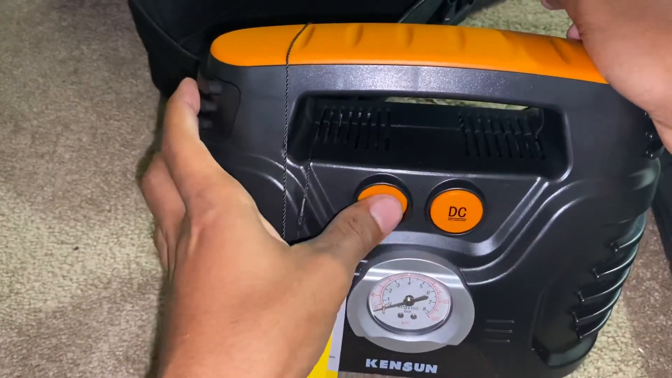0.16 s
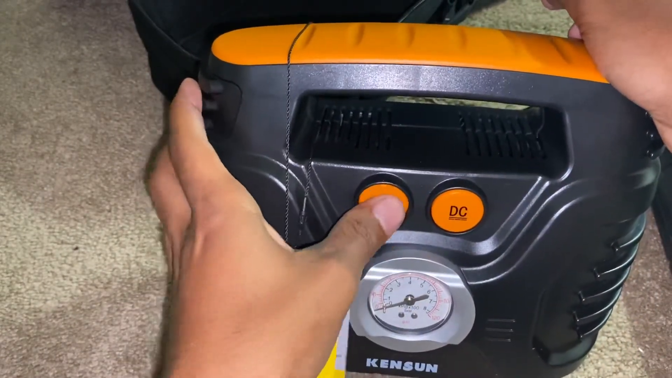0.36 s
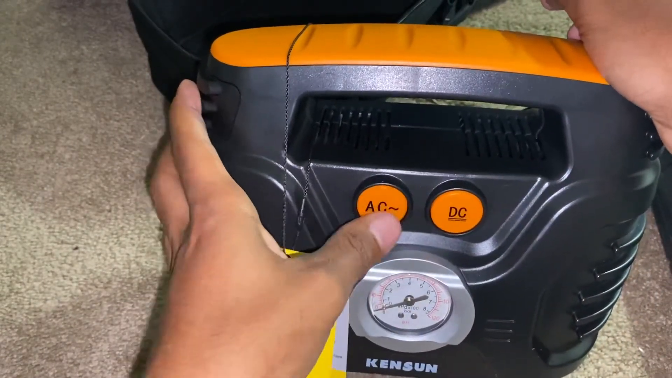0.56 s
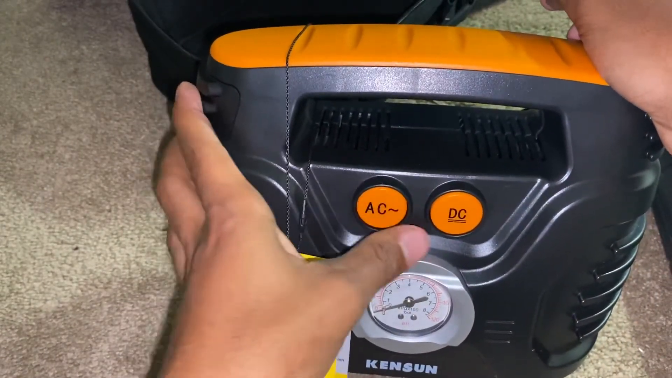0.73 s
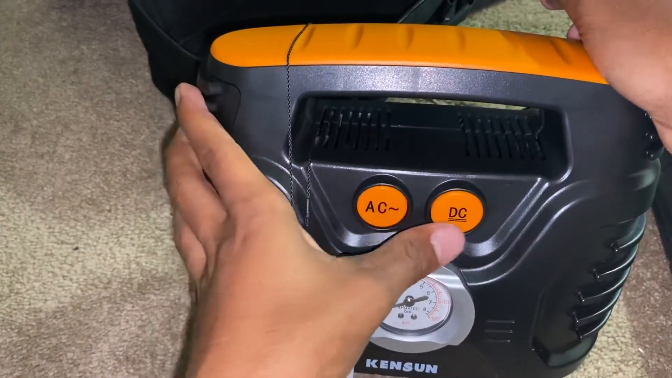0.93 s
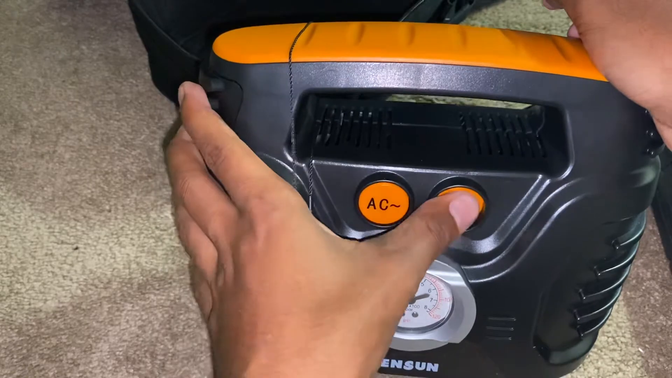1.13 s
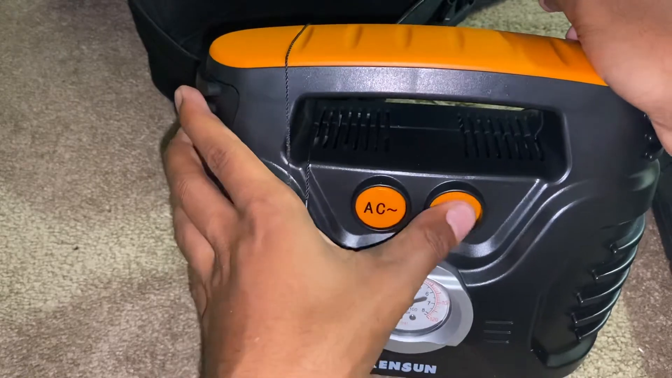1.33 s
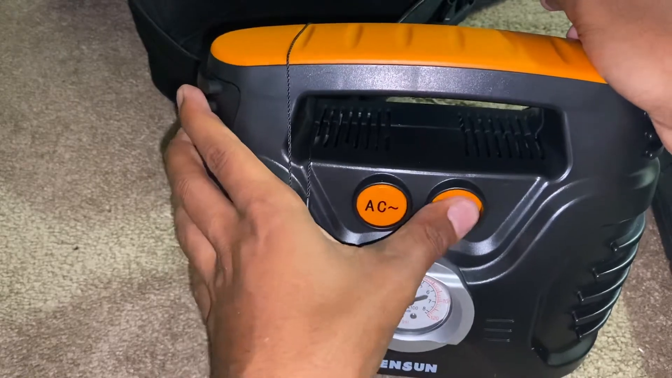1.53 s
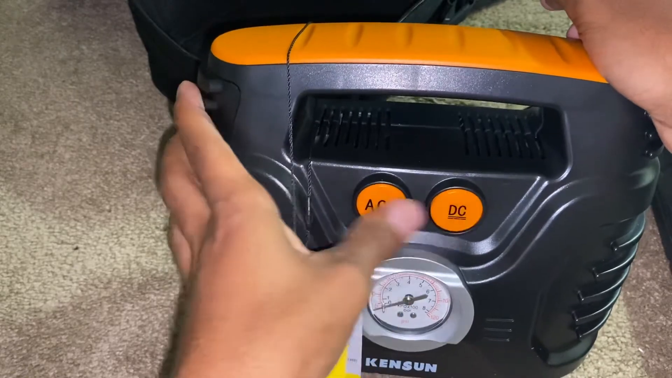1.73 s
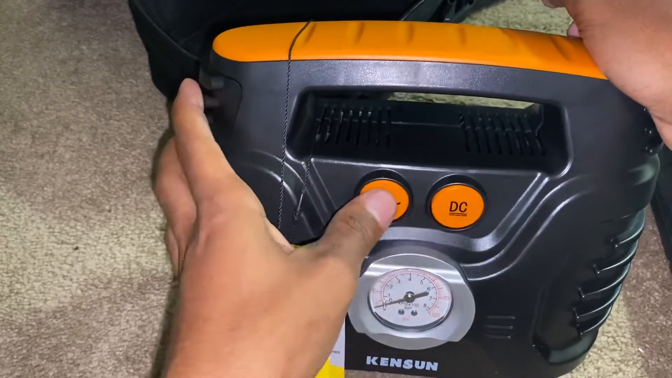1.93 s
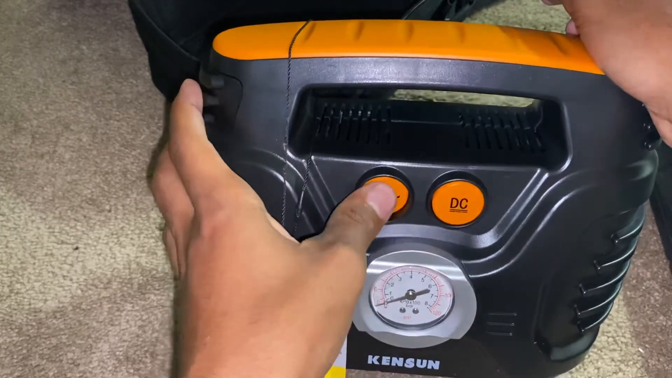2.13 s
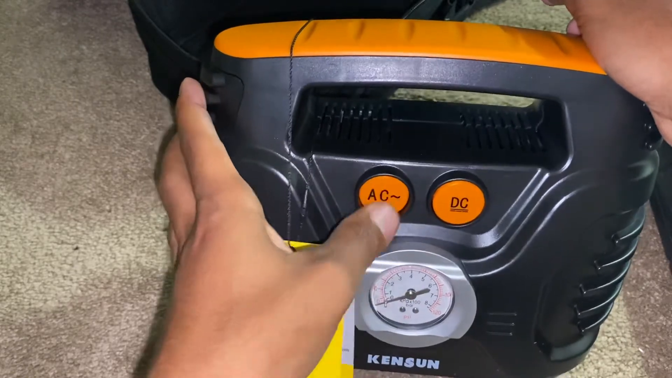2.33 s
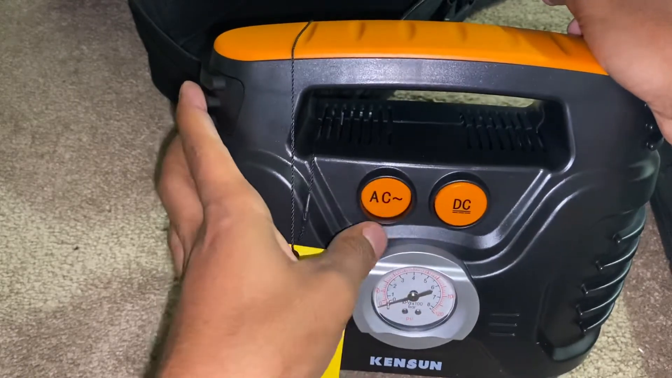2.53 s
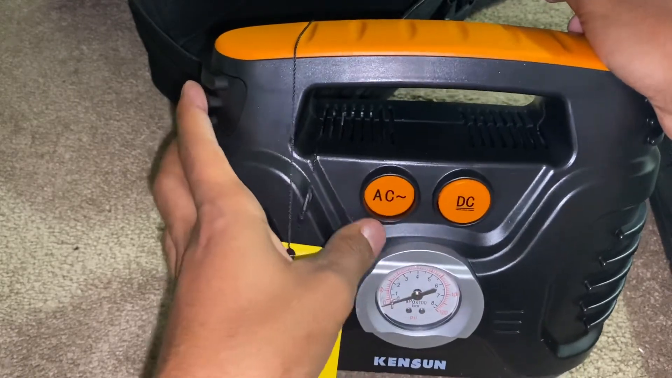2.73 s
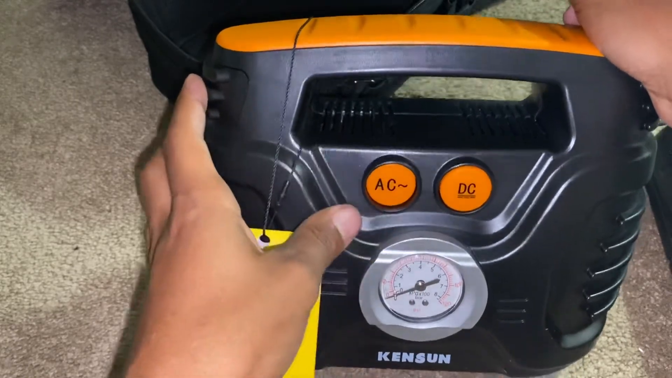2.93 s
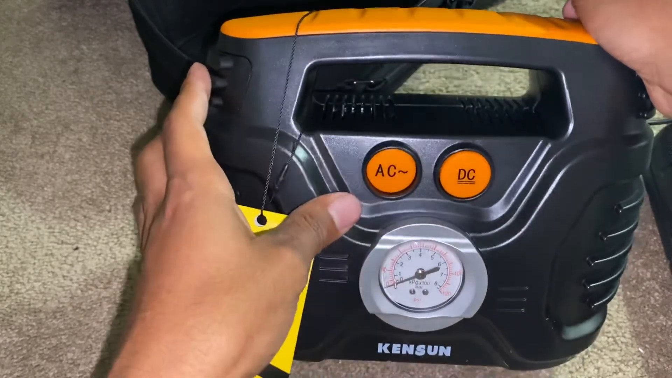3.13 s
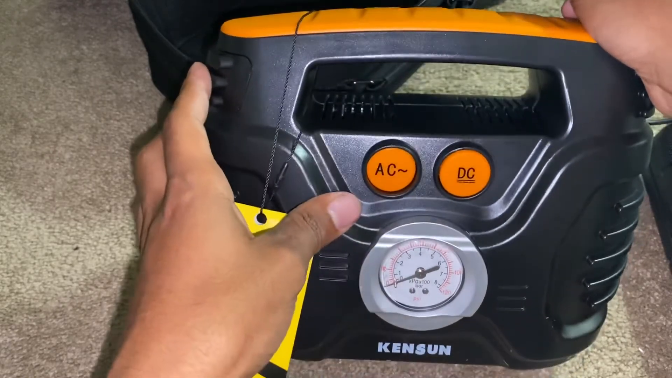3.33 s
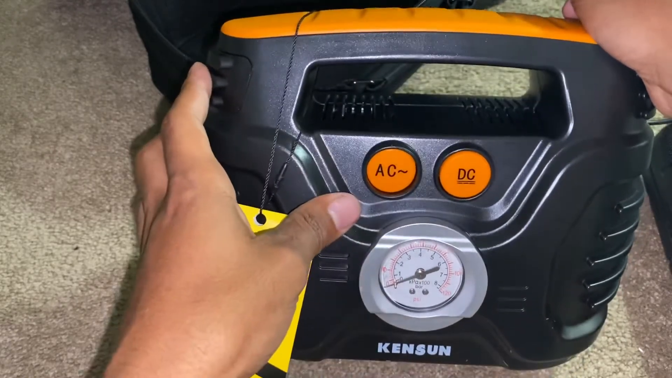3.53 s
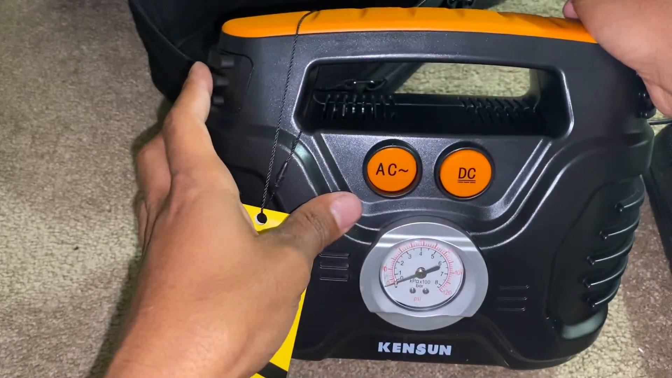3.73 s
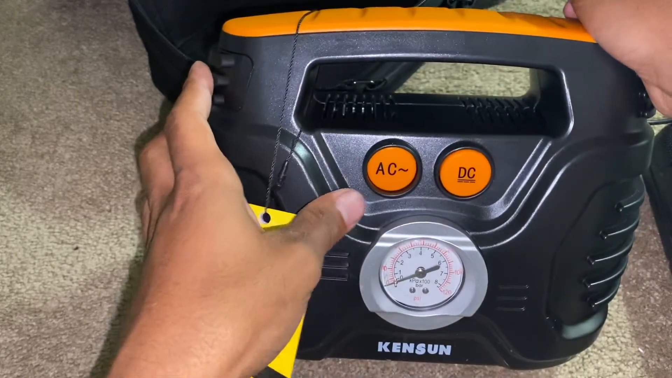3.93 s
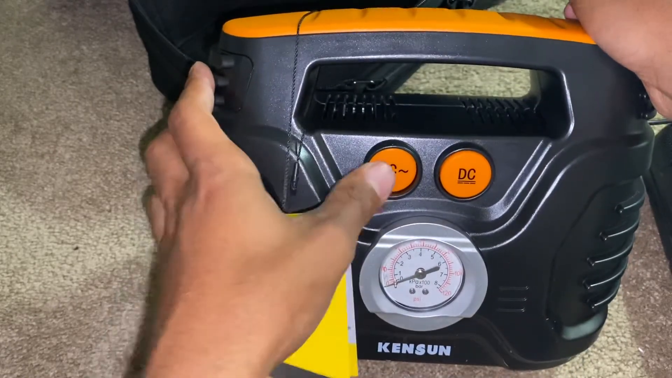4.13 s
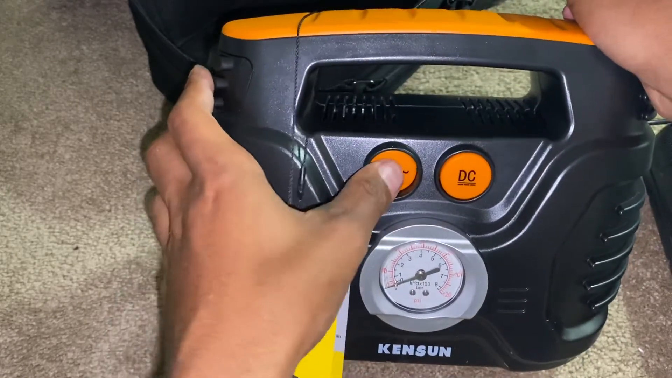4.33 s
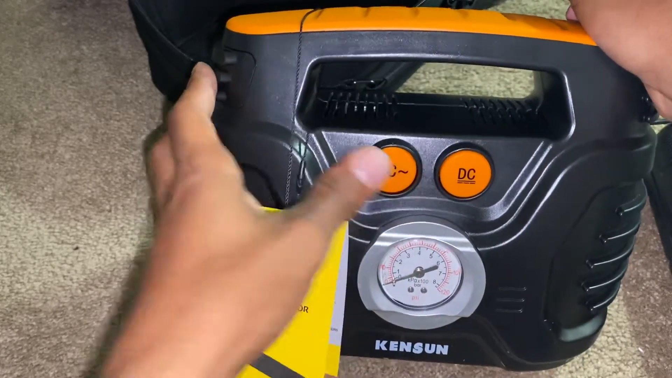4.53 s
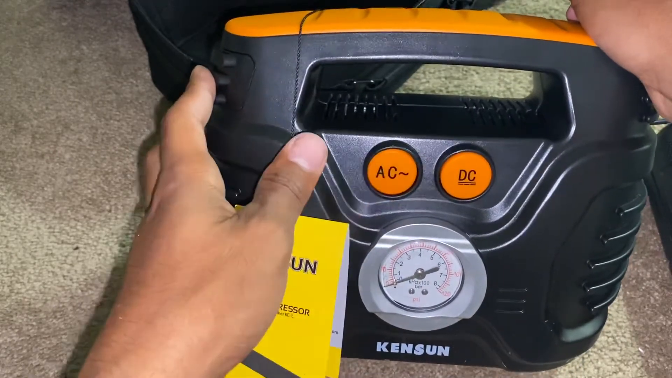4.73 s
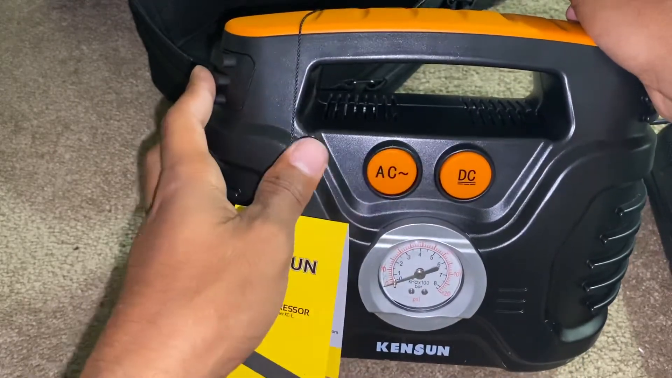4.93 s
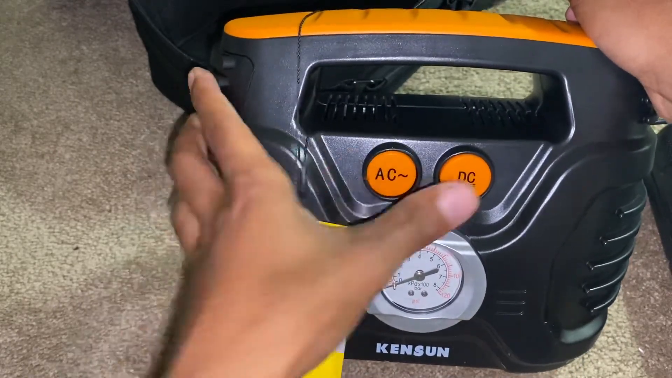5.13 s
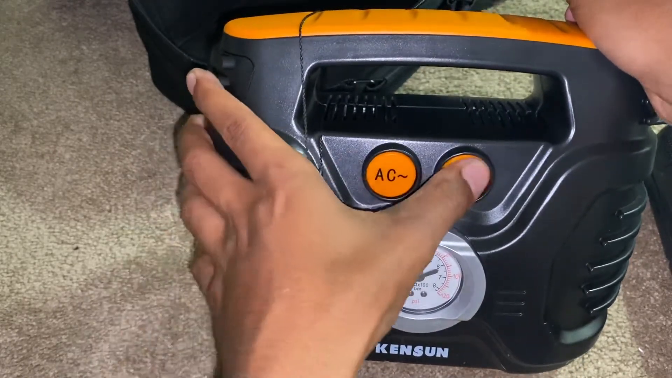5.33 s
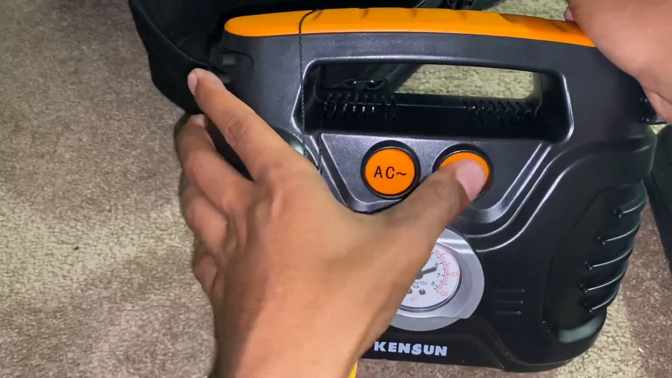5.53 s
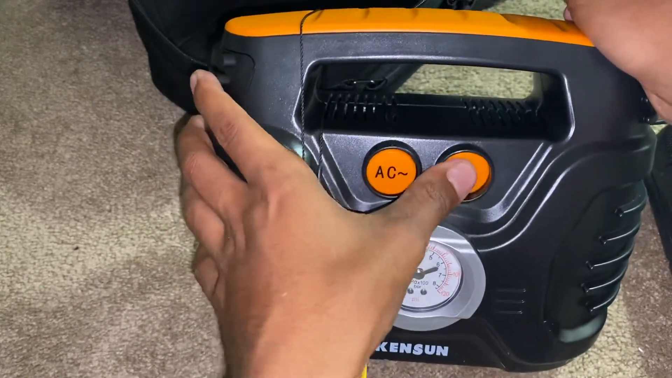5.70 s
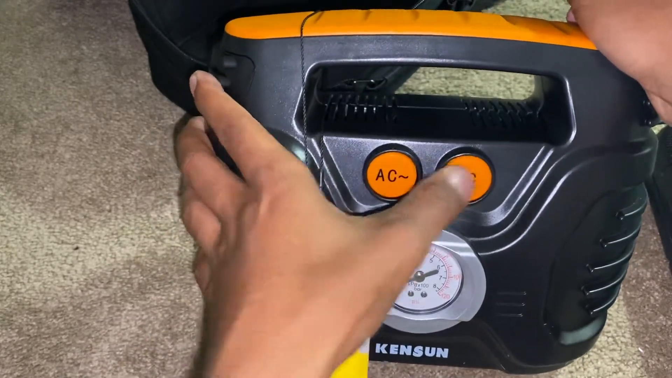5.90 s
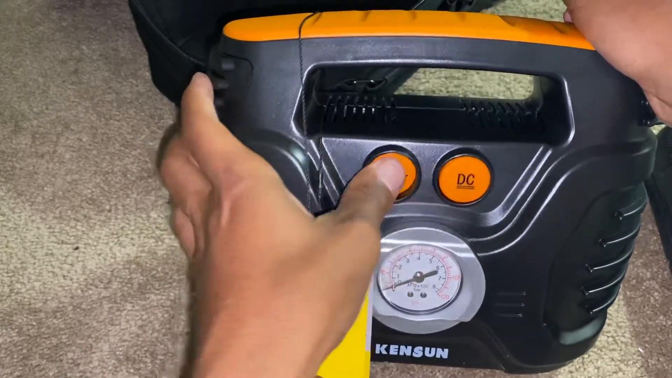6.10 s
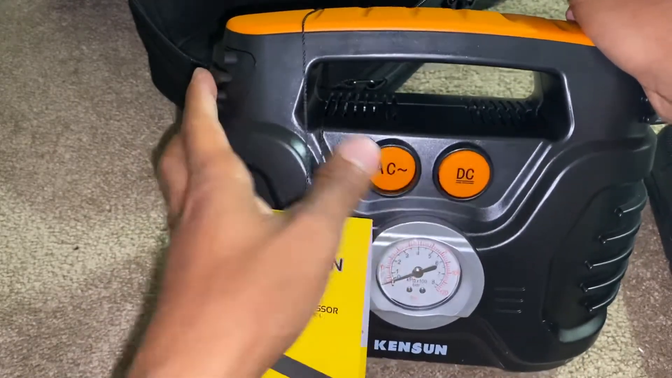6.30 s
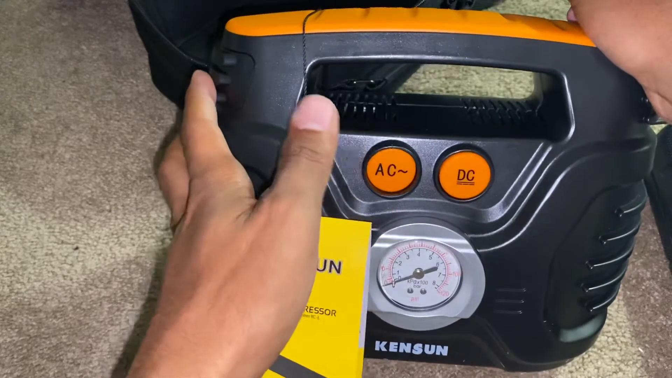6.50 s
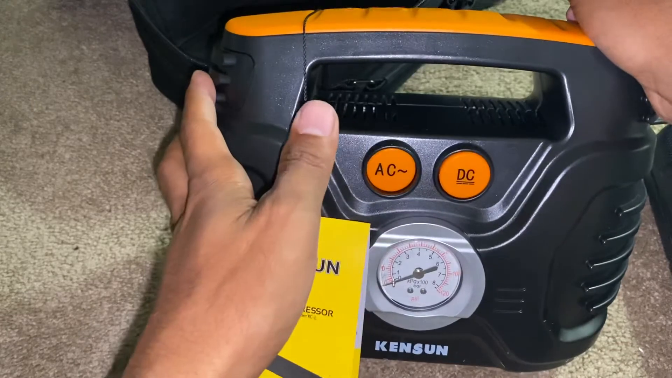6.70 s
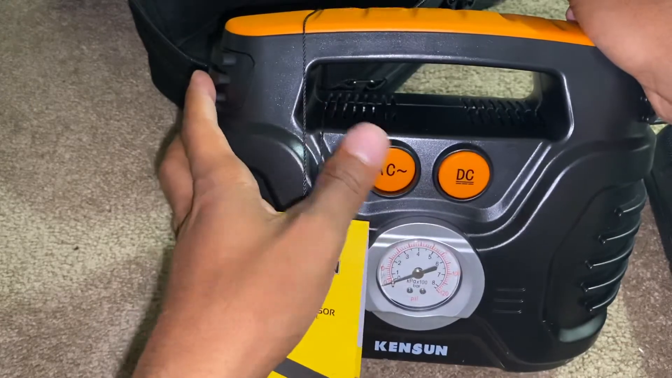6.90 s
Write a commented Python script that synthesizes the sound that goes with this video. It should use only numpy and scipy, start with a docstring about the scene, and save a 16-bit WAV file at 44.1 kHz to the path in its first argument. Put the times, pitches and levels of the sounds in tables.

```python
"""A small piston air pump in a plastic case on a carpet is heard close to a phone, already running.
Each crank turn gives an airy puff and three knocks, built from pulses that ring the case and from shaped noise.
It coasts down with squeaks; a thumb rustles and clicks push buttons (noise bursts and ringing plastic).
The pump starts again, coasts to a stop, more clicks follow, and a third run lasts to the end.
A steady hum and a dull rumble of noise lie under it all."""
import sys
import numpy as np
from scipy import signal
from scipy.fft import rfft, irfft, next_fast_len
from scipy.io import wavfile
from scipy.ndimage import map_coordinates

SR = 44100
rng = np.random.default_rng(int(sys.argv[2]) if len(sys.argv) > 2 else 0)


def store_wav(level_fs):
    """Save 16-bit WAV to argv[1]."""
    pcm = np.round(np.clip(np.atleast_2d(level_fs), -1, 1) * 32767)
    wavfile.write(sys.argv[1], SR, pcm.T.astype(np.int16))


N = 306936
T = np.arange(N) / SR  # time in s

# colour of rushing air and motor whirr through the case: pitch_hz, relative level_db (per Hz)
AIR_COLOUR = [(40, -19), (60, -8), (150, -10), (420, 1.5), (1150, -1), (1550, -2.5), (1850, -0.5),
              (2250, -4), (2700, -5), (3030, -5), (3350, -5), (4200, -6), (4900, -8), (6500, -9.5),
              (8500, -4.5), (11000, -4), (13000, -4.5), (14000, -11.5), (15700, -12), (16100, -53)]
# bright snaps of the switches: start_s, level_db
SWITCH_SNAPS = [(1.1029, -45.5), (1.1324, -29), (1.3259, -28), (1.5005, -27), (1.6474, -26.5),
                (1.7928, -44), (2.1206, -33), (5.3914, -26.5), (5.5293, -25.5), (5.6924, -46.5),
                (5.7144, -25), (5.8474, -24), (6.0921, -46.5), (6.1074, -29.5)]
SNAP_T60_S = 0.017  # a snap or skin tick falls by 60 dB in this time


def amp(db):
    """Turn decibels into a plain multiplier."""
    return 10 ** (np.asarray(db) / 20)


def unit(x):
    """Scale a sound to an rms (average strength) of 1."""
    return x / np.sqrt(np.mean(x ** 2) + 1e-20)


def along(points, hz):
    """Read a value between (Hz, value) points on a log frequency axis."""
    f, v = np.transpose(points)
    return np.interp(np.log(hz + 1), np.log(f + 1), v)


def wobble(rate):
    """A smooth random curve through this many random points a second."""
    points = rng.standard_normal(int(N * rate / SR) + 4)
    return map_coordinates(points, [T * rate])


def filtered(x, response):
    """Change the strength and phase of each frequency by a response."""
    m = next_fast_len(N + SR // 2)
    hz = np.fft.rfftfreq(m, 1 / SR)
    return irfft(rfft(x, m) * response(hz), m)[..., :N]


def noise(spectrum):
    """Coloured noise of rms 1."""
    return unit(filtered(rng.standard_normal(N), lambda hz: amp(along(spectrum, hz))))


def spread(mid, side, alike):
    """Make left and right from a shared part and an opposed part, mixed by likeness at each frequency."""
    def shares(hz):
        angle = np.arccos(np.clip(along(alike, hz), -1, 1)) / 2
        return np.array([np.cos(angle), np.sin(angle)])
    mid, side = filtered(np.array([mid, side]), shares)
    return np.array([mid + side, mid - side])


def crank():
    """Speed in Hz and turns counted from a puff: a quick spin-up, then coasting against drag."""
    # runs of the motor: on_s, off_s, time of one puff_s, full crank speed_hz
    runs = [(-1, .406, .048, 53.2), (2.108, 4.498, 4.337, 53.28), (6.103, 9, 6.352, 53.12)]
    spin_up_s, coast_s = .034, .365  # time constants
    drag_hz = 24  # coasting heads this far below zero, so the crank really stops
    speed, turns = np.zeros(N), np.zeros(N)
    for on, off, puff, hz in runs:
        rise = 1 - np.exp(-np.maximum(T - on, 0) / spin_up_s)
        coasting = (hz + drag_hz) * np.exp(-np.maximum(T - off, 0) / coast_s) - drag_hz
        run = rise * np.maximum(coasting, 0)
        count = np.cumsum(run) / SR
        speed = speed + run
        turns = np.where(T >= on, count - count[round(puff * SR)], turns)
    return speed, turns + .008 * wobble(5)


def gain(speed, column):
    """Gain of one layer at this crank speed: a faster crank is mostly louder."""
    # loudness against speed: crank speed_hz, knocks_db, puff_db, whirr_db (all relative)
    effort = np.array([(0.99, -43.5, -58, -56), (8.2, -15, -42.5, -32.5), (18.5, -12, -4.5, -10),
                       (30, -5.5, -2.5, -12.5), (43, -2, 0.5, -1), (57.4, 0, 0.5, 2)])
    return amp(np.interp(speed, effort[:, 0], effort[:, column])) * (speed > 0)


def knocks(speed, turns):
    """Piston, rod and valve plate strike once a turn, each into its own modes of the case."""
    # knocks of one turn: share of the turn after the puff, modes as (pitch_hz, width_hz, relative level_db)
    knock_modes = [(0.2021, [(247, 130, -8), (377, 69, 0.5), (431.2, 44.4, 1), (701.6, 33, -2),
                   (810, 58, -5.5)]), (-.06, [(625, 54, -8.5), (824, 27, -17), (1113, 27, -6),
                   (1320, 32, -14)]), (0.19, [(1376, 45, -9.5), (1806, 110, -12.5), (1837, 62, -3),
                   (2013, 65, -11.5), (2400, 200, -28.5), (3016, 130, -16), (4190, 190, -24)])]
    least_loss = .055  # narrowest mode: width over frequency; plastic damps its high modes fast
    out = np.zeros(N)
    for share, modes in knock_modes:
        struck = (np.diff(np.floor(turns - share)) > 0) & (speed[1:] > 1)
        at = np.flatnonzero(struck)
        luck = rng.standard_normal((len(at), 2))
        # each blow varies a little in time (samples) and in strength (dB)
        places = np.clip(at + np.round(1.9 * luck[:, 0]).astype(int), 0, N - 1)
        blows = np.bincount(places, amp(0.57 * luck[:, 1]), N)

        def case(f):
            total = 0
            for k, (c, width, db) in enumerate(modes):
                loss = 1j * f * max(width, least_loss * c)
                total = total + (-1) ** k * amp(db) * loss / (c * c - f * f + loss)
            return total

        out += filtered(blows * gain(speed, column=1), case)
    return amp(25) * out


def pump(speed, turns):
    """The steady part (knocks, shake) and the airy part (puff of each stroke, even whirr, wavering gear tone)."""
    # unbalance of the crank: multiple of crank speed, rms level_db at top speed
    unbalance = [(1, -44.5), (2, -35), (4, -34.5)]
    gear_ratio = 33.72  # gear tone as a multiple of crank speed
    pace = speed / speed.max()
    tones = sum(np.sqrt(2) * amp(db) * np.sin(2 * np.pi * k * turns) for k, db in unbalance)
    shake = tones * pace ** 2.8
    # slow strokes are narrower within their turn, so they stand further apart
    sharp = 1.9 + 1.0 * (1 - pace)
    stroke = np.exp(sharp * (np.cos(2 * np.pi * turns) - 1)) * amp(1.7 * wobble(45))
    puff = amp(-21.5) * stroke * gain(speed, column=2) * noise(AIR_COLOUR)
    whirr = amp(-29.5 + 0.56 * wobble(4.9)) * noise(AIR_COLOUR)
    mesh = amp(1.5 * wobble(40)) * np.sin(2 * np.pi * (gear_ratio * turns + .15 * wobble(25)))
    gear = amp(-37) * mesh * (.5 + stroke)  # the teeth are loaded hardest in the stroke
    return knocks(speed, turns) + shake, puff + gain(speed, column=3) * (whirr + gear)


def valve(speed, turns):
    """Slow air past the valve reed whistles unsteadily with its octave, longer as the crank slows."""
    # squeak level while coasting, silent outside this range: crank speed_hz, level_db
    squeak_levels = [(14, -29), (25, -26.5), (45, -26)]
    # groans of the nearly stalled strokes, last or first of a run: start_s, length_s, pitch_hz, level_db
    groans = [(0.724, .025, 460, -32), (.739, 0.03, 986, -33), (2.121, 0.019, 907, -28),
              (4.78, 0.016, 690, -30.5), (4.785, 0.019, 480, -28.5), (4.799, .025, 920, -32.5),
              (4.84, 0.054, 424, -48), (6.128, .012, 760, -26.5)]
    lead, share = .13, .46  # a squeak starts this part of a turn before the puff and lasts this part of a turn
    squeak_hz, squeak_rise, squeak_octave_db = 770, 10000, -11  # starting pitch, rise in Hz per s
    groan_rise, groan_octave_db = 1500, -15  # rise in Hz per s
    out = np.zeros(N)
    leak = amp(-13) * noise(AIR_COLOUR)  # air hissing through the reed, below the whistle
    drift, flutter = .75 * wobble(170), amp(2.5 * wobble(90))  # phase in radians, gain
    coasting = np.diff(speed) < 0
    in_range = (speed[1:] > squeak_levels[0][0]) & (speed[1:] < squeak_levels[-1][0])
    at = np.flatnonzero((np.diff(np.floor(turns + lead)) > 0) & coasting & in_range)
    cries = [(i / SR, share / speed[i], squeak_hz, along(squeak_levels, speed[i]), squeak_rise, squeak_octave_db)
             for i in at]
    cries += [(*row, groan_rise, groan_octave_db) for row in groans]
    for start, length, hz, db, rise, octave_db in cries:
        t = np.arange(int(length * SR)) / SR
        here = slice(round(start * SR), round(start * SR) + len(t))
        phase = 2 * np.pi * (hz * t + rise * t ** 2 / 2) + drift[here]
        shape = np.sin(np.pi * (t / length) ** .6) ** .8
        whistle = np.sin(phase) + amp(octave_db) * np.sin(2 * phase)
        out[here] += amp(db) * shape * (whistle + leak[here])
    return out * flutter


def buttons():
    """Each contact is a bright snap of the switch and a duller ring of the plastic."""
    # modes of a button and its panel: pitch_hz, relative level_db, t60_s (time to fall by 60 dB)
    panel_modes = [(380, -17, .035), (560, -14, .03), (850, -13, .02), (1200, -5, .019), (1450, -2, .018),
                   (1900, -3, .016), (2350, -1, .018), (2750, -1, .016), (3200, -8, .012),
                   (4400, -13, .012), (7200, -15, .01)]
    # colour of a snap: pitch_hz, relative level_db (per Hz)
    snap_colour = [(300, -14), (1500, -6.5), (4500, -4), (7000, -5.5), (11000, -4.5), (14500, -2),
                   (16500, -7.5)]
    # dull thuds of thumb or cap against the panel: start_s, level_db
    thuds = [(1.0784, -42.5), (1.1383, -29), (1.6526, -22), (2.1206, -25.5), (5.1948, -50.5), (5.3963, -26),
             (5.5513, -33), (5.8534, -18), (5.9725, -49.5)]
    snap_rise_s, ring_rise_s = 0.00056, 0.00096
    ring, snap, t = np.zeros(N), np.zeros(N), np.arange(SR // 10) / SR
    # a snap also rings the panel, a thud also snaps: start_s, ring_db, snap_db
    contacts = [(s, db - 22.5, db) for s, db in SWITCH_SNAPS] + [(s, db, db - 14) for s, db in thuds]
    for start, ring_db, snap_db in contacts:
        luck = rng.standard_normal((len(panel_modes), 2)) * [2.5, .04]  # level in dB, share of the pitch
        modes = np.zeros(len(t))
        for k, ((hz, level, t60), (extra_db, detune)) in enumerate(zip(panel_modes, luck)):
            fade = amp(level + extra_db - 60 * t / t60)
            modes += (-1) ** k * fade * np.sin(2 * np.pi * hz * (1 + detune) * t)
        here = slice(round(start * SR), round(start * SR) + len(t))
        ring[here] += amp(ring_db) * modes * (1 - np.exp(-t / ring_rise_s))
        snap[here] += amp(snap_db - 60 * t / SNAP_T60_S) * (1 - np.exp(-t / snap_rise_s))
    rattle = wobble(900)
    return ring * (1 + .3 * rattle), ring * rattle, snap * noise(snap_colour)


def thumb():
    """Soft grainy rustles with scattered ticks as the skin slides and presses."""
    # the thumb slides over the plastic: start_s, length_s, level_db
    slides = [(1.072, 0.048, -61), (1.764, .14, -64.5), (5.144, 0.11, -66.5), (5.352, 0.044, -58),
              (5.952, 0.074, -66), (6.076, .05, -58)]
    # colour of the skin's rustle: pitch_hz, relative level_db (per Hz)
    skin_colour = [(150, -19.5), (500, 8.5), (1500, 5), (3000, 5), (8000, -6), (15000, -26)]
    press_s, press_db = .03, -41  # the skin rustles just before a snap, this far below it
    ticks_per_s, tick_db = 45, 12  # the skin sticks and slips; ticks over the rustle
    presses = [(s - press_s, press_s, db + press_db) for s, db in SWITCH_SNAPS]
    swell = np.zeros(N)
    for start, length, db in slides + presses:
        size = int(length * SR)
        swell[round(start * SR):][:size] += amp(db) * np.hanning(size) ** .5
    grain = amp(4 * wobble(250))
    slips = (rng.random(N) < ticks_per_s / SR) * amp(tick_db)
    ticks = signal.fftconvolve(slips, amp(-60 * T[:SR // 50] / SNAP_T60_S))[:N]
    return swell * (unit(grain * noise(skin_colour)) + ticks * noise(skin_colour))


def room(x):
    """Echoes as a burst of noise: each frequency of the room's answer dies at its own speed."""
    # fading of the room: pitch_hz, t60_s (time to fall by 60 dB)
    fading = [(200, .16), (2000, .14), (6000, .17), (12000, .2)]
    hz, t, z = signal.stft(rng.standard_normal(SR // 3), SR, nperseg=256)
    decay = amp(-60 * t / along(fading, hz)[:, None])
    tail = signal.istft(z * decay, SR, nperseg=256)[1]
    late = np.pad(x, (300, 0))  # the answer starts 300 samples late
    return signal.fftconvolve(late, tail / np.linalg.norm(tail))[:N]


def room_tone():
    """Mains hum, stronger on the left, over a dull rumble."""
    # colour of the rumble: pitch_hz, relative level_db (per Hz)
    rumble_colour = [(22, -36.5), (35, -21.5), (55, -5.5), (95, -4), (140, -14), (250, -18.5), (290, -24.5),
                     (600, -27.5), (1000, -36), (3000, -48), (8000, -64), (14000, -84.5)]
    # likeness of left and right in the rumble: pitch_hz, likeness (-1 to 1)
    rumble_alike = [(60, 1), (130, -0.0078), (290, -0.16), (640, 0.0093), (3000, -0.32), (6500, 0.23),
                    (15000, 0.85)]
    waver = amp(.6 * wobble(6)) * np.sin(2 * np.pi * 120 * T + .06 * wobble(5))
    hum = amp(-41.5) * waver * amp([[2.2], [-2.2]])  # left, right
    rumble = spread(noise(rumble_colour), noise(rumble_colour), rumble_alike)
    return hum + amp(-47.5 + 1.5 * wobble(1.7)) * rumble


def scene():
    """Add pump, valve, buttons and thumb with their echoes, then spread them over the room tone."""
    # likeness of left and right: pitch_hz, likeness (1 is the same)
    likeness = [(60, 0.99), (400, 0.92), (700, 0.36), (1300, 0.85), (1900, 0.68), (2600, 0.18),
                (4300, 0.39), (5600, 0.24), (6700, 0.92), (16000, 1)]
    speed, turns = crank()
    beat, air = pump(speed, turns)
    ring, loose, snap = buttons()
    close = beat + valve(speed, turns)
    hand = snap + thumb()
    faint = amp(-13) * room(close) + amp(-11) * room(loose)
    heard = close + ring + faint + air + amp(-10.5) * room(air) + hand + amp(-14) * room(hand)
    # a random delay of up to 32 ms for each frequency makes the two sides differ, for a wide sound
    scatter = rng.uniform(0, 2 * np.pi, 700).cumsum()
    knots = np.linspace(0, SR / 2, len(scatter))
    scattered = filtered(heard, lambda hz: np.exp(-1j * np.interp(hz, knots, scatter)))
    return spread(heard, scattered, likeness) + room_tone()


def record(dry):
    """A slowly creeping level, two ports of unlike colour and lag, and a band limit."""
    # slow level changes: time_s, bass_db, treble_db
    creep = [(0, -5, -0.5), (.4, -2.5, -1), (2.1, -1, 1), (2.5, 0, 3.5), (3.2, 0, 0.5), (4.5, 0.5, 0),
             (6.1, 2, 1), (6.96, 1.5, 1)]
    # colour of the ports: pitch_hz, left minus right_db
    lean = [(300, 0), (1500, 1.5), (1900, -3), (2900, 3.5), (4500, 1.5), (6500, 0.5)]
    # the left port lags in the treble: pitch_hz, lag in half cycles
    lag = [(7000, 0), (8800, 1), (9450, 1), (10500, 2), (11500, 2), (12850, 3), (13650, 3), (14600, 4)]
    top_hz = 16500
    s, bass_db, treble_db = np.transpose(creep)
    bass = filtered(dry, lambda hz: 1 / (1 + (hz / 1800) ** 2))
    treble = dry - bass
    crept = bass * amp(np.interp(T, s, bass_db)) + treble * amp(np.interp(T, s, treble_db))
    half = np.array([[.5], [-.5]])  # each side takes half of the difference

    def ports(hz):
        turned = np.exp(-1j * np.pi * half * along(lag, hz))
        return amp(half * along(lean, hz)) * turned * (hz < top_hz)

    return filtered(crept, ports)


dry = scene()
out = record(dry)
store_wav(out)
```